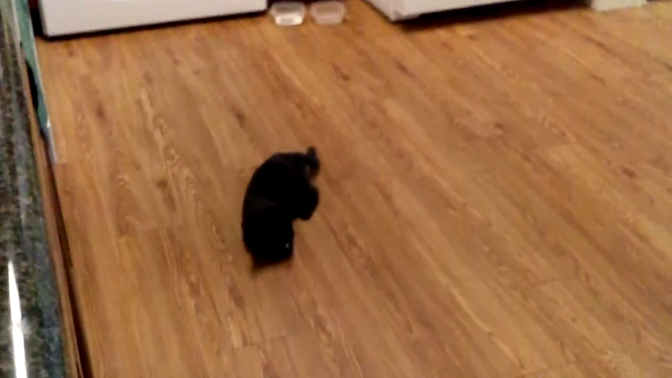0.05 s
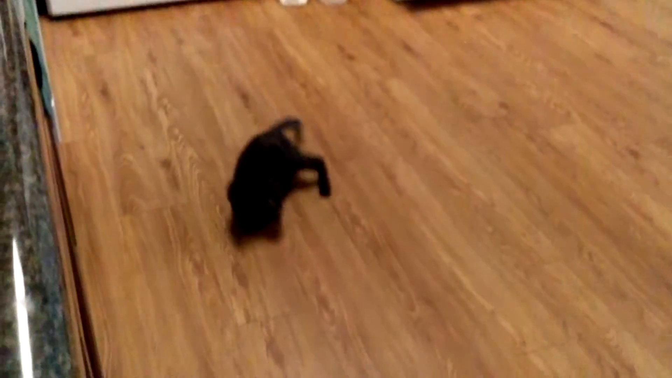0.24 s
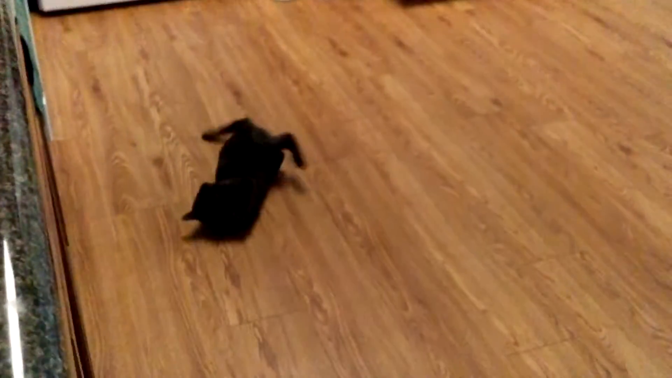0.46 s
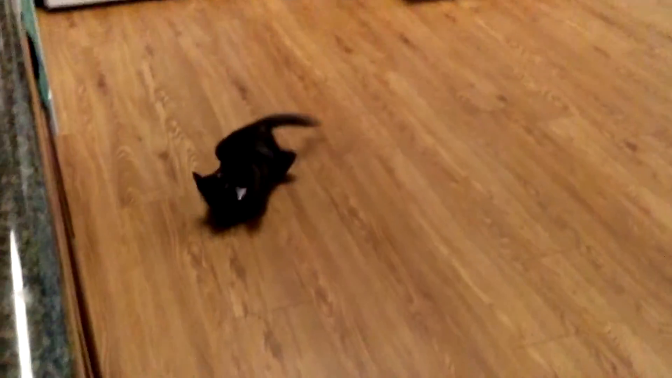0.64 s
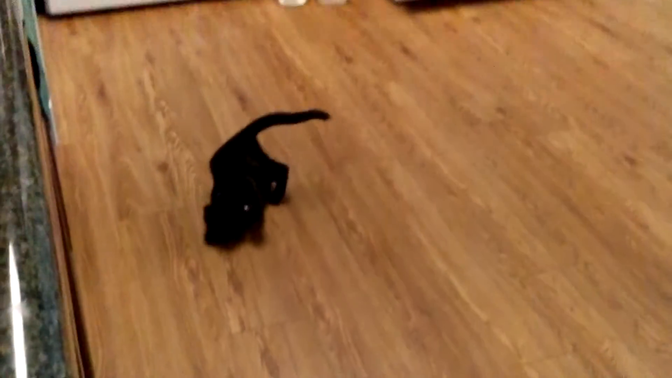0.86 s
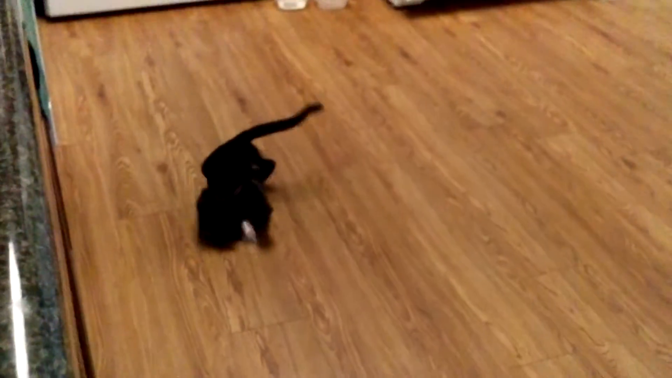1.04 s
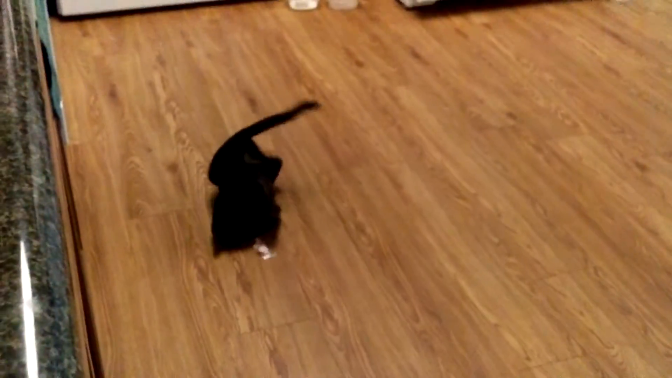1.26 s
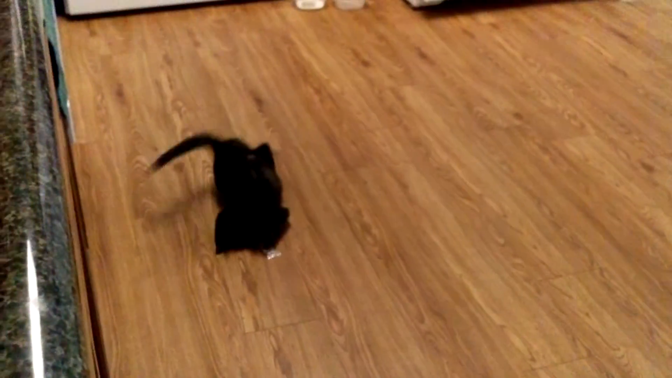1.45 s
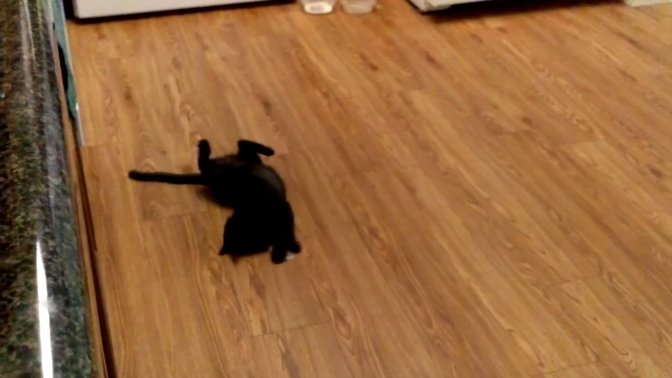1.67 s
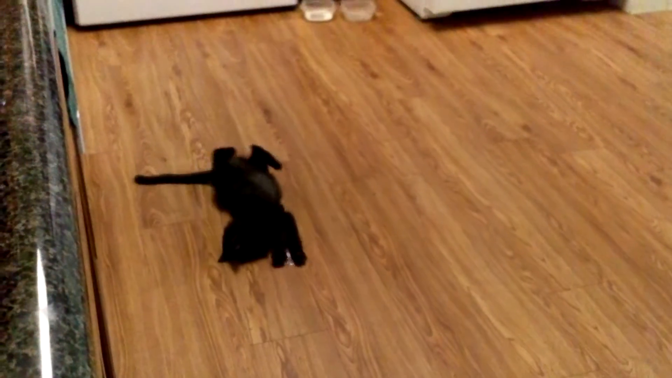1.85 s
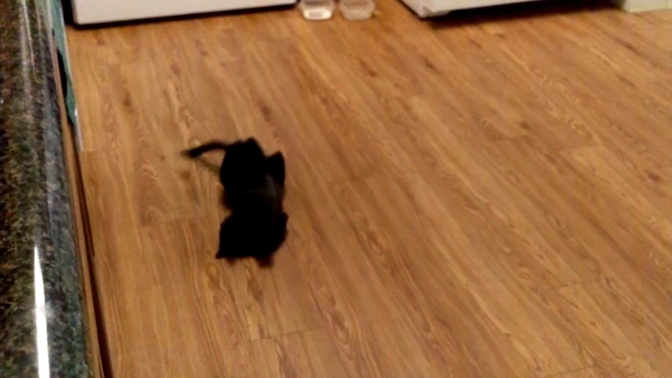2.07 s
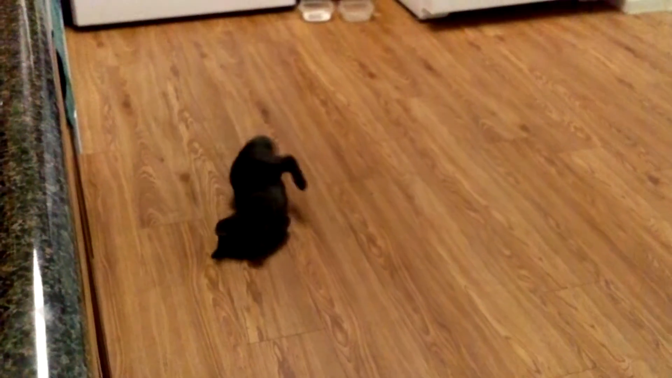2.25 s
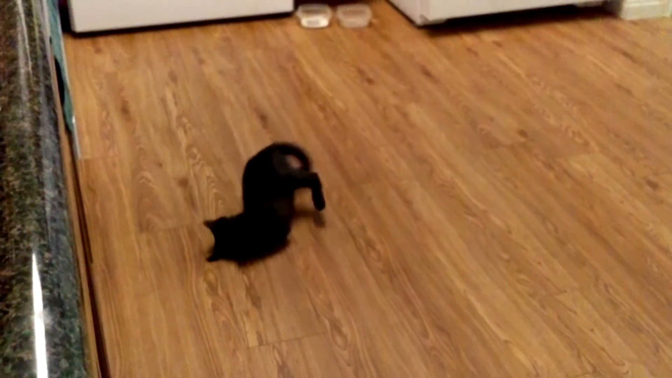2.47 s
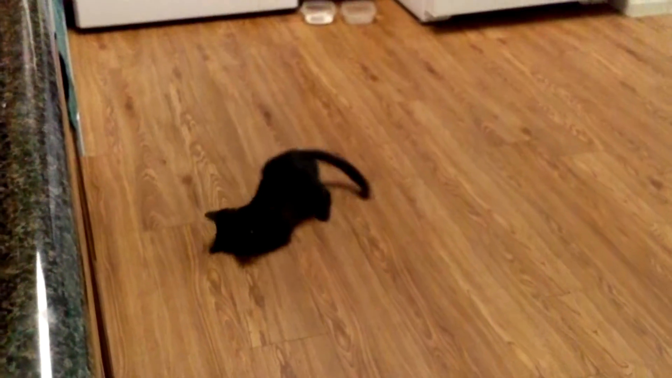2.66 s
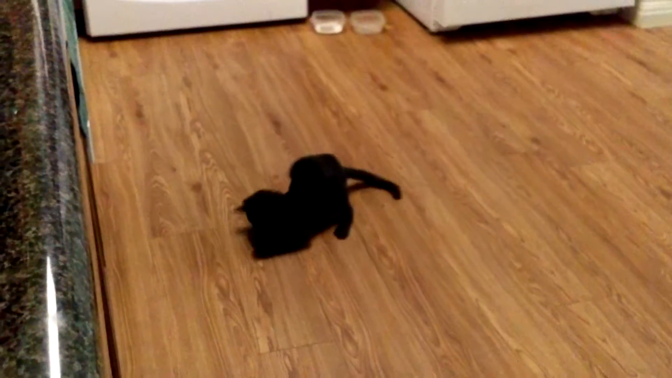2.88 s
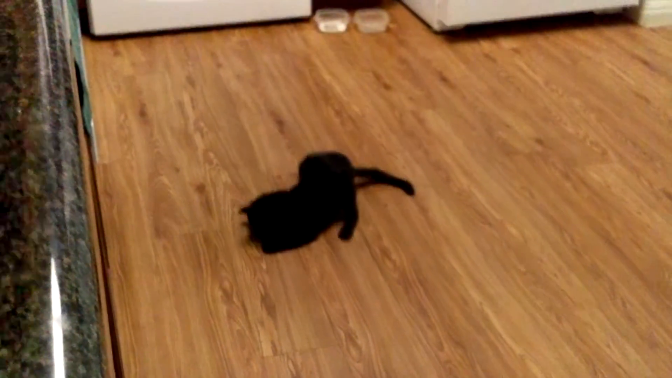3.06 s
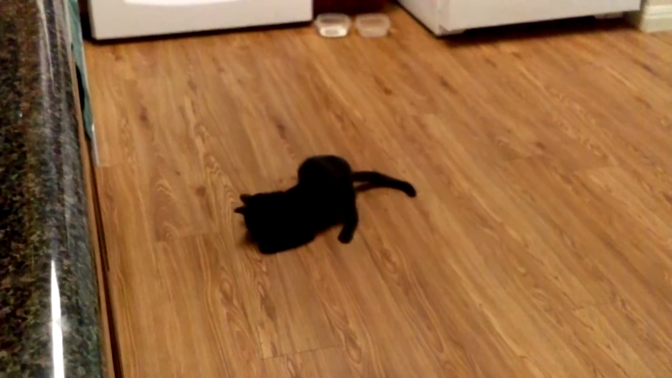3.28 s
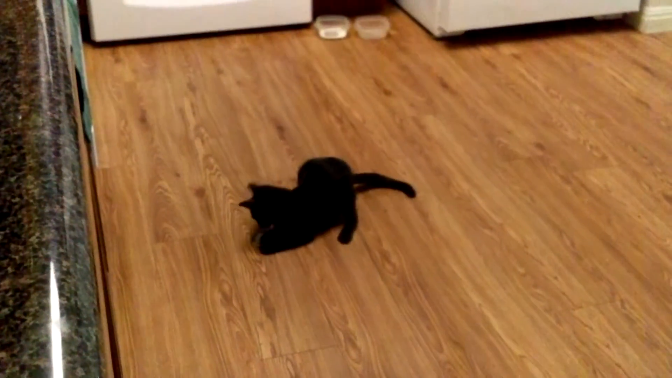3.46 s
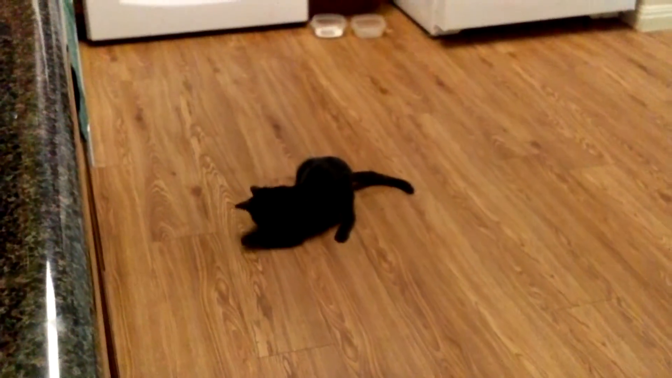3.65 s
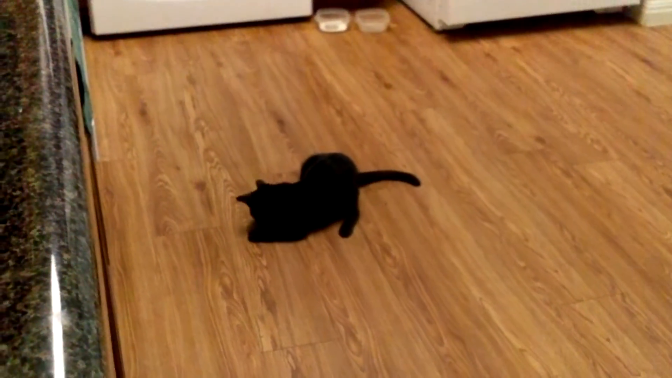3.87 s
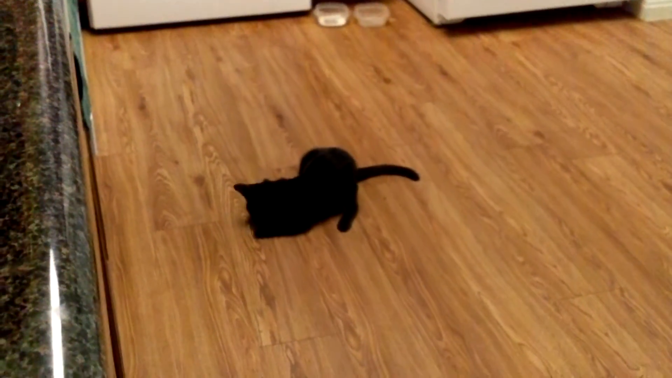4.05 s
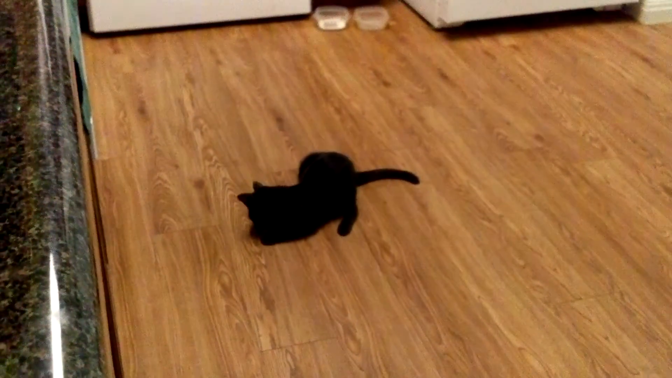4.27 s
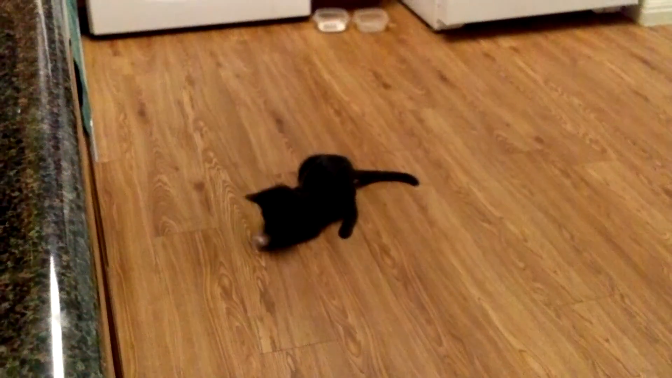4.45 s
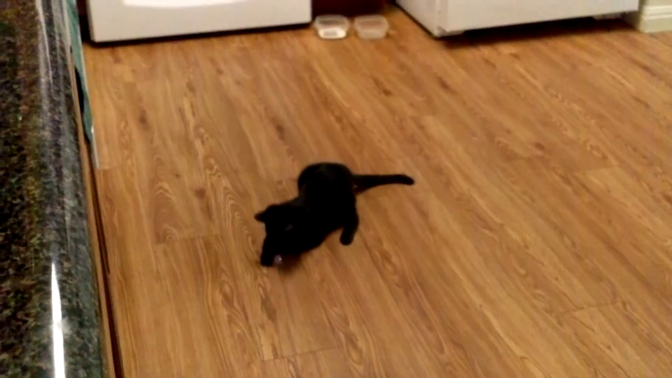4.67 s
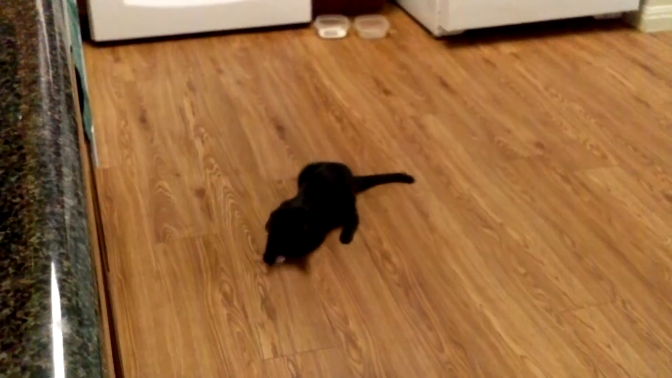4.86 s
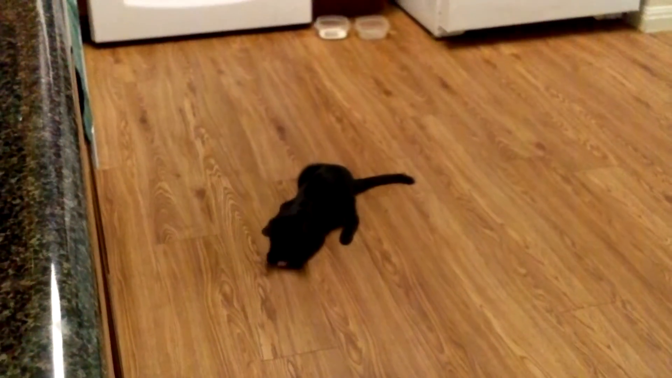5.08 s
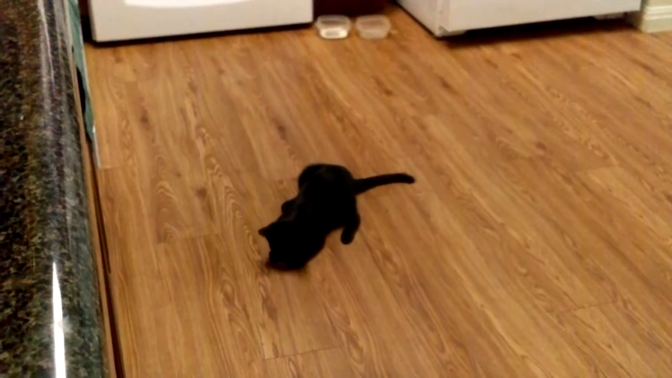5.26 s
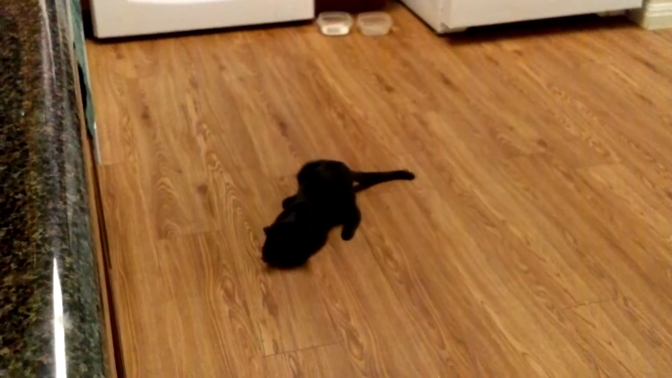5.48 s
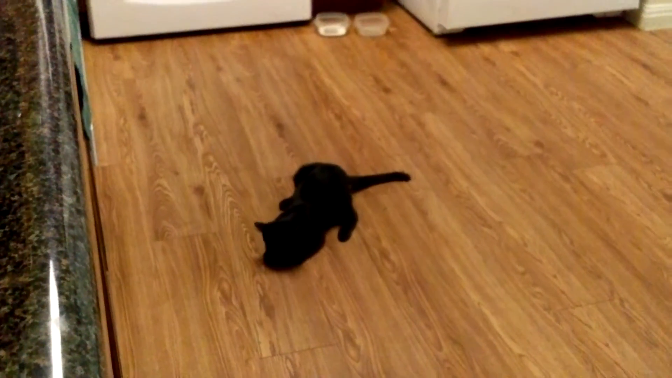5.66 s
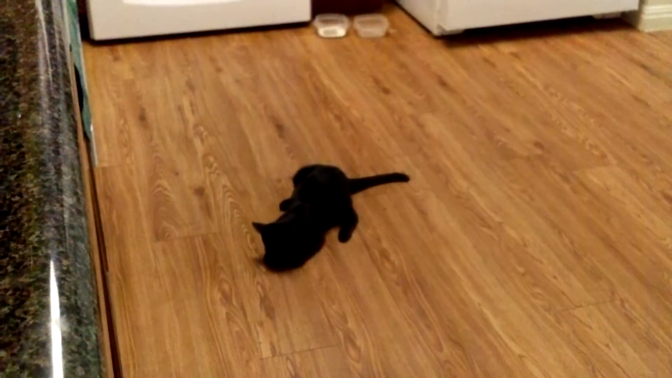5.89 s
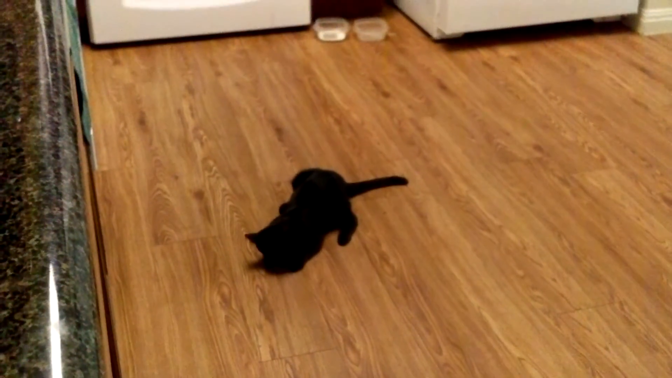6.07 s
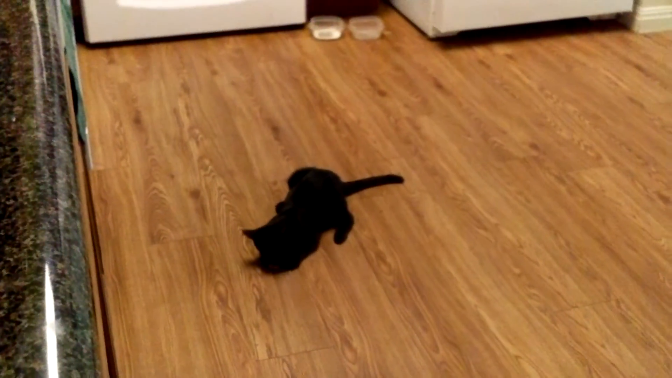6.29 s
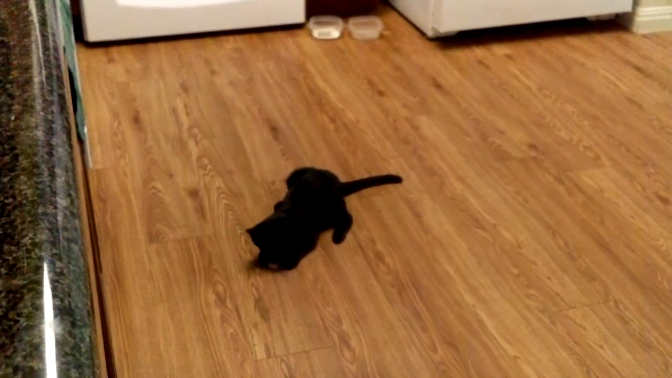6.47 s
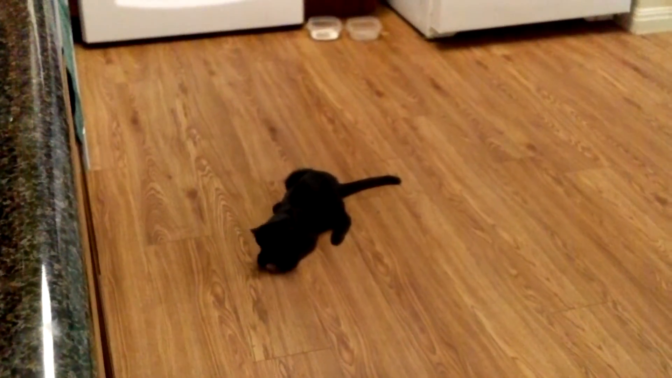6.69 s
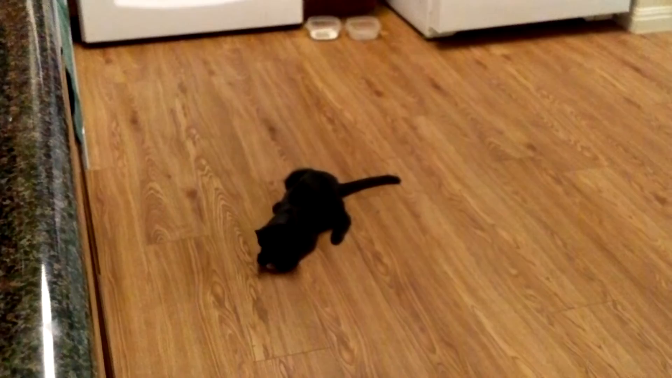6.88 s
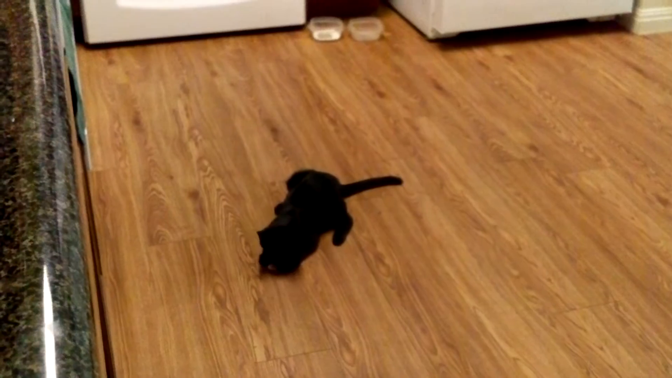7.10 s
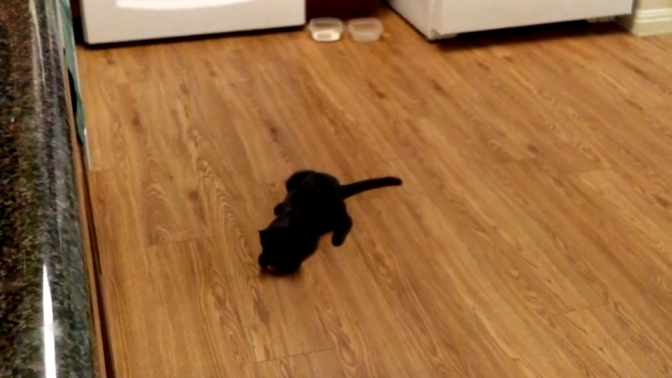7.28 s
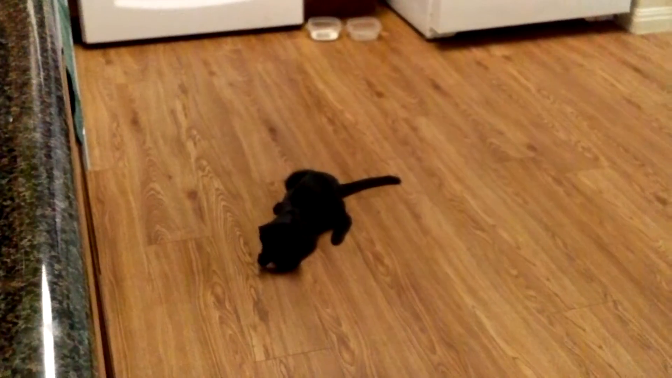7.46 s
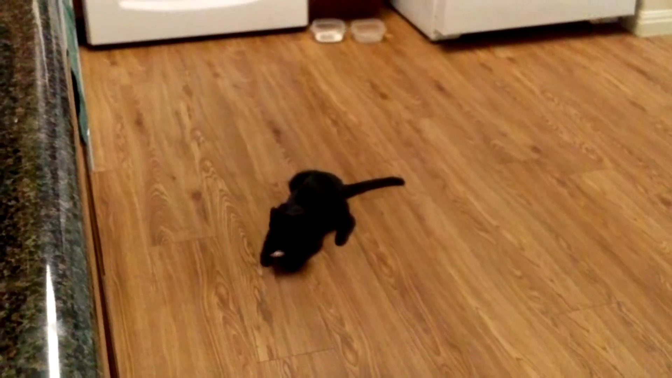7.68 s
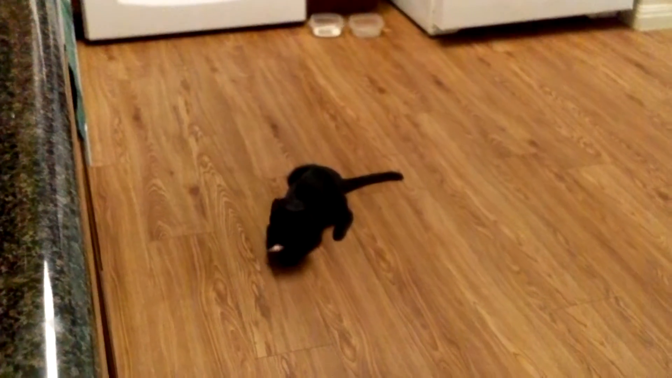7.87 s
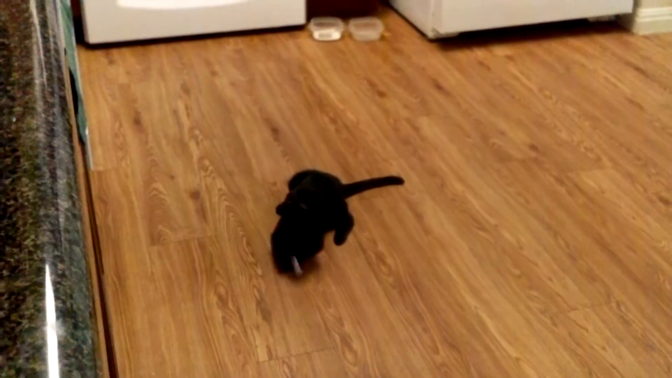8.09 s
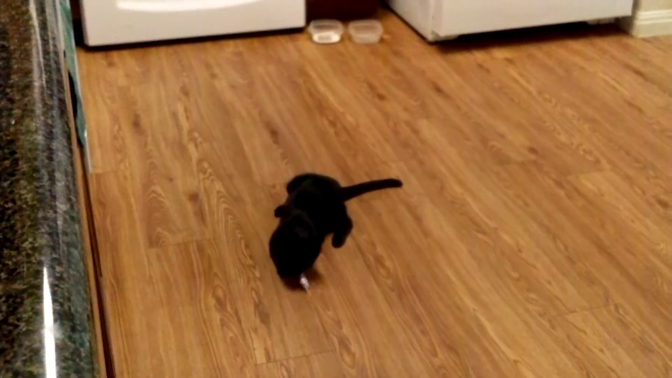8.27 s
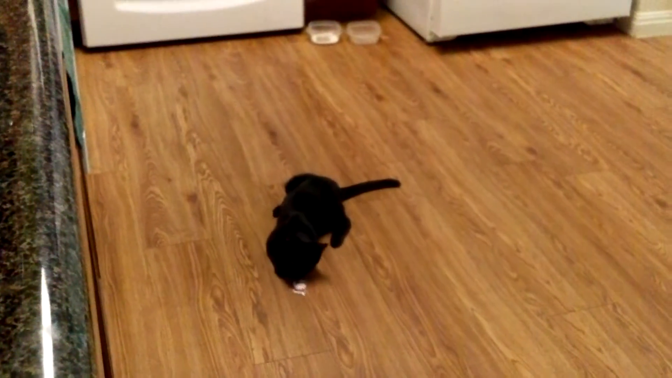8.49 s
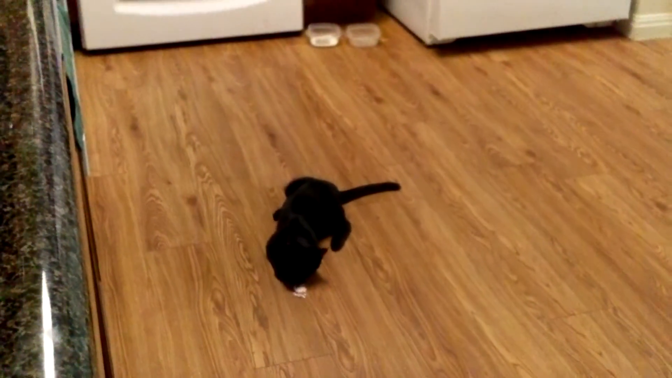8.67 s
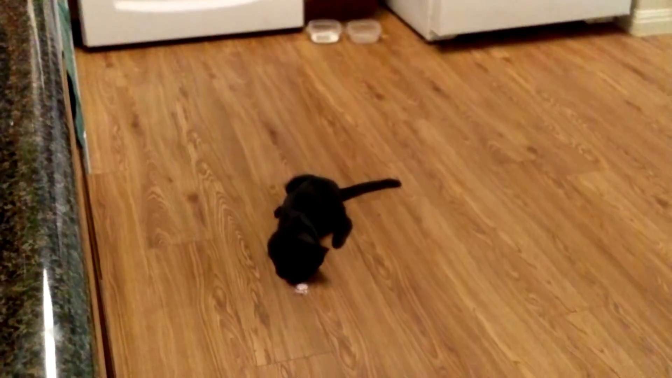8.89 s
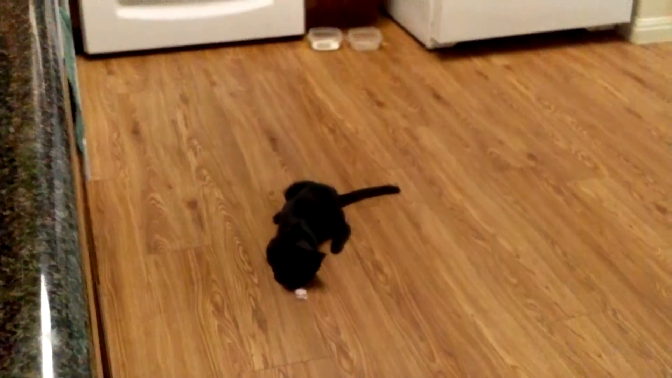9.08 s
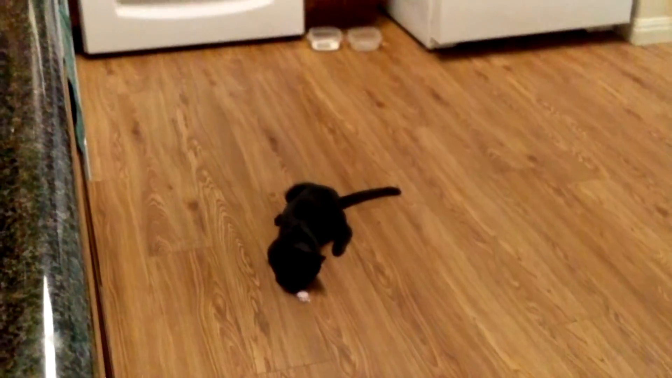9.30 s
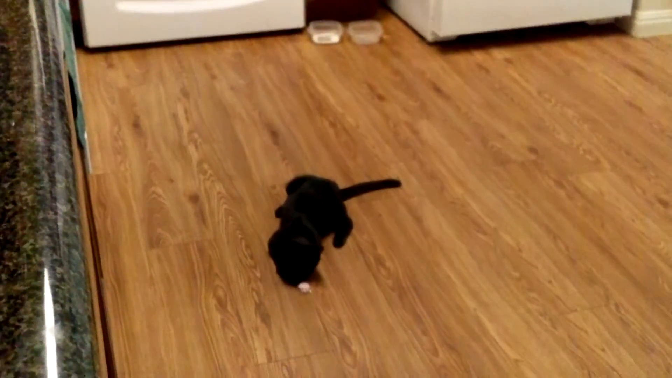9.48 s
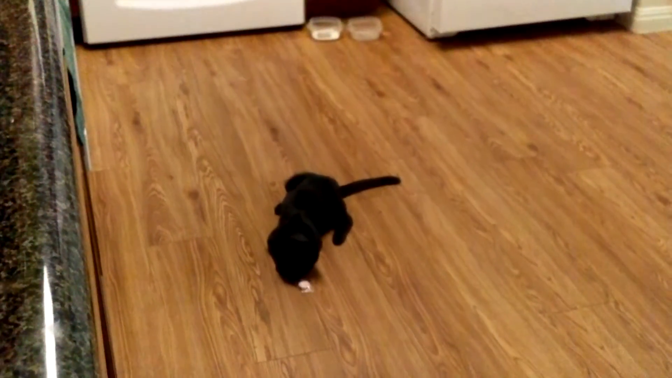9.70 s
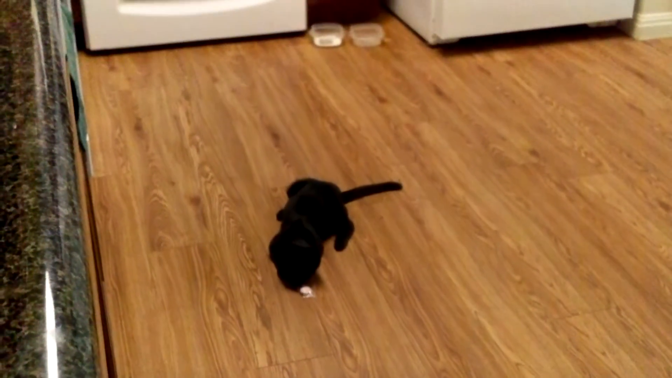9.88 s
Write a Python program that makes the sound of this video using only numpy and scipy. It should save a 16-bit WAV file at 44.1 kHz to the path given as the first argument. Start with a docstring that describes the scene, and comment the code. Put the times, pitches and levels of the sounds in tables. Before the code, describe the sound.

Irregular crackles and snaps of a plastic wrapper batted by a cat across hard boards, two bright clicks as it falls, faint fridge hum.

```python
"""Wrapped mint on a kitchen floor

A cat bats, shoves and nudges a mint in crisp plastic film over laminate boards and twice lets it drop.
The film buckles in swarms of decaying noise clicks and single snaps; noise bursts knock and scrape the boards.
Claws tap a decaying woody note; each landing of the hard sweet is a filtered click with ringing modes.
The bare room adds half a second of reverberation over a faint fridge rush of noise, low hums and a high whistle.
A small recorder limits the band and squashes the loudest peaks."""
import sys
import numpy as np
from scipy import signal
from scipy.fft import rfft, irfft
from scipy.io import wavfile
from scipy.ndimage import uniform_filter1d

SR = 44100
rng = np.random.default_rng(int(sys.argv[2]) if len(sys.argv) > 2 else 0)


def wav_out(sig):
    """Save sig, one row per channel (or a flat mono array), as 16-bit PCM at SR to the path in sys.argv[1]."""
    wavfile.write(sys.argv[1], SR, np.round(np.clip(np.atleast_2d(sig).T, -1, 1) * 32767).astype(np.int16))


N = 438354  # length in samples


def undb(db):
    """Level to amplitude: 20 dB is a factor of ten."""
    return 10 ** (np.asarray(db) / 20)


def unit(x):
    """Energy normalisation: the squares sum to one."""
    return x / np.sqrt(np.sum(x ** 2) + 1e-18)


def seconds(length):
    """Sampling: the time axis of a short sound, in seconds."""
    return np.arange(int(length * SR)) / SR


def decay(t, t60):
    """Exponential decay: the amplitude falls by 60 dB in t60 seconds."""
    return np.exp(-np.log(1000) * t / t60)


def add(out, start_s, x):
    """Superposition: mix x into out from a start time, cut at both ends of out."""
    first = int(start_s * SR)
    x = x[max(-first, 0):]
    first = max(first, 0)
    out[first:first + len(x)] += x[:max(len(out) - first, 0)]


def along(points, hz):
    """Logarithmic frequency scale: interpolate (Hz, value) points along it."""
    point_hz, value = np.transpose(points)
    return np.interp(np.log(hz + 1), np.log(point_hz), value)


def colour(x, points, size=2048):
    """Minimum phase: a folded cepstrum turns a spectrum into a causal filter of unit energy."""
    level_db = along(points, np.fft.rfftfreq(size, 1 / SR))
    cepstrum = irfft(np.log(undb(level_db)))
    cepstrum[1:size // 2] *= 2
    cepstrum[size // 2 + 1:] = 0
    response = unit(irfft(np.exp(rfft(cepstrum))))
    return signal.fftconvolve(x, response)[:len(x)]


def low_pass(x, hz, order=10):
    """Band limiting: a steep elliptic filter, 0.2 dB ripple and 70 dB rejection."""
    sections = signal.ellip(order, .2, 70, hz, fs=SR, output="sos")
    return signal.sosfilt(sections, x)


def walk(rate_hz):
    """Smoothed random steps: a slow wander with a spread near one."""
    step = int(SR / rate_hz)
    held = np.repeat(rng.standard_normal(N // step + 1), step)
    return uniform_filter1d(held, step)[:N]


def cracks(count, decay_s, size=256):
    """Impulsive release: exponentially fading noise bursts of energy one, each with a chance colour."""
    x = rng.standard_normal((count, size)) * np.exp(-np.arange(size) / SR / decay_s)
    return x / np.sqrt(np.sum(x ** 2, axis=1, keepdims=True))


def swarm(length_s, rate, spread_db, decay_s, skew=1):
    """Crackling noise: uneven clicks swell and fade with one push, early if skew is under 1; rms one."""
    count = int(rate * length_s) + 2
    place = (np.arange(count) + rng.uniform(-1, 1, count) + .5).clip(0, count) / count
    # small folds are common, and no fold can store more than so much strain
    strain = np.minimum(rng.exponential(size=count), 2.4)
    sizes = np.sin(np.pi * place ** skew) * undb(spread_db * strain)
    out = np.zeros(int((length_s + .01) * SR))
    for u, size, crack in zip(place, sizes, cracks(count, decay_s)):
        add(out, u * length_s, size * crack)
    return unit(out) * np.sqrt(length_s * SR)


def facet(x, hz, q=2.03, lift=1.86):
    """Plate resonance: the flat of film beside a crease favours its own pitch; the energy is kept."""
    b, a = signal.iirpeak(min(hz, SR / 4), q, fs=SR)
    ring = signal.lfilter(b, a, x)
    return unit(x + lift * ring) * np.sqrt(np.sum(x ** 2))


# broadband rush of the fridge, relative: frequency_hz, level_db
FRIDGE_SPECTRUM = [(20, -14), (60, -11.5), (105, -7), (141, -12), (175, -6), (205, -13), (250, -2.5),
                   (315, -2), (400, -7.5), (540, -6.5), (635, -6.5), (720, -9), (1560, -11.5),
                   (2400, -15.5), (4200, -17.5), (6100, -12), (7400, -17), (8250, -14.5), (10000, -14)]
# steady tones of the background, low hums and one faint high whistle: mean pitch_hz, rms level_db
BACKGROUND_TONES = [(258, -72.5), (640, -71.5), (8256, -74)]


def background(rush_db=-54.5):
    """Noise plus tones: a soft fridge rush, low hums and a high whistle, phase-modulated so pitch wanders."""
    noise = rng.standard_normal(N)
    rush = colour(noise, FRIDGE_SPECTRUM + [(13000, -53)], size=8192)
    t = np.arange(N) / SR
    tones = sum(undb(db) * np.sin(2 * np.pi * hz * t + 2 * walk(6)) for hz, db in BACKGROUND_TONES)
    waver = undb(.25 * walk(5))
    return waver * (undb(rush_db) * rush + np.sqrt(2) * tones)


# spells in which the cat keeps nudging the wrapper: start_s, end_s, mean crinkle level_db before mixing
NUDGE_SPELLS = [(0.679, 1.099, -46.5), (2.121, 2.411, -49.5), (3.121, 3.42, -52.5), (3.732, 3.948, -57),
                (4.059, 4.199, -51.5), (4.918, 5.1, -55.5), (5.872, 5.96, -54), (7.25, 7.761, -51.5),
                (7.842, 7.96, -56.5)]


def nudges(per_s=14, length_s=.07, spread_db=1.7, floor_db=-11):
    """Jittered timing: light shoves of varying force, one at a chance moment in each slot of a spell."""
    rows = []
    for start, end, db in NUDGE_SPELLS:
        count = max(round(per_s * (end - start)), 1)
        lateness, forces = rng.random(count), rng.standard_normal(count)
        for k, (late, force) in enumerate(zip(lateness, forces)):
            nudge_start = start + (k + late) / count * (end - start - length_s)
            rows.append((nudge_start, length_s, db + spread_db * force, floor_db))
    return rows


# single shoves, short or long, whose crinkle and scrape swell and fade, before mixing:
# start_s, length_s, crinkle level_db, floor share_db (relative to the crinkle)
SINGLE_SHOVES = [(-0.025, 0.048, -27, -13.5), (0.05, 0.12, -44, -12.5), (0.2, 0.22, -43, -14.5),
                 (0.53, .12, -34, -16), (1.122, .055, -39.5, -16), (1.308, .12, -44.5, -0.5),
                 (1.63, 0.058, -40.5, -2.5), (1.917, 0.18, -43.5, -16.5), (2.025, 0.11, -35.5, -16.5),
                 (2.6, .09, -56, -9), (3.95, .06, -48, -11), (4.228, 0.046, -42, -7),
                 (4.28, .12, -45, -10.5), (4.42, 0.084, -39, -17), (4.535, 0.092, -34.5, -18),
                 (4.672, 0.085, -38.5, -12.5), (5.29, .07, -53, -4.5), (5.39, 0.12, -53, -6),
                 (6.09, 0.095, -42, -11.5), (6.19, 0.12, -51, -10), (7.47, 0.16, -44.5, -14),
                 (8.037, 0.059, -46, -20), (8.4, .034, -34.5, -11.5), (8.443, 0.026, -40.5, 2.5),
                 (8.83, .06, -51.5, -8.5)]


def shoves(film, boards, pressed_hz=5800, free_hz_per_db=200, pop_db=26):
    """Distributed buckling: crinkle and scrape swell together, and one crease pops on the way."""
    for start, length, db, floor_db in list(SINGLE_SHOVES) + nudges():
        # film pressed on the floor sounds low, and higher as it comes free
        hz = pressed_hz - free_hz_per_db * floor_db
        crinkle = swarm(length, rate=600, spread_db=5.5, decay_s=0.00039)
        pop = cracks(1, decay_s=0.00037)[0]
        scrape = swarm(length, rate=450, spread_db=2, decay_s=0.00078)
        add(film, start, undb(db) * facet(crinkle, hz))
        # pop energy is set against the rms of the crinkle
        add(film, start + length * rng.beta(2, 2), undb(db + pop_db) * facet(pop, hz))
        add(boards, start, undb(db + floor_db) * scrape)


# sharp bats and taps of the paw, before mixing:
# start_s, snap energy level_db, settling length_s, floor share_db (relative to the film), facet pitch_hz
PAW_BATS = [(0.0481, 0.5, 0.054, -15, 9200), (0.1833, -8, 0.021, -26, 8400), (0.4337, 0, .08, -12.5, 9000),
            (0.5637, -5, 0.031, -12, 8800), (0.8136, -6, .06, -12.5, 6400),
            (1.0299, -10.5, 0.022, -9, 8150), (1.5543, 0, 0.024, -11.5, 9900),
            (1.6357, -1, 0.027, -14, 10000), (1.8288, -7, .08, -19, 7300), (2.206, -5, .012, -21, 10000),
            (2.289, -10, .06, -31, 8500), (2.8235, -14.5, .18, -11.5, 9000),
            (3.0154, -5, 0.048, -10.5, 9250), (3.0998, -10, .04, -9.5, 8600), (3.154, -4, .012, -21, 10000),
            (4.214, -9.5, .04, -18, 9150), (4.7218, -6, .03, -6.5, 3900), (4.901, -14.5, 0.055, -12, 7860),
            (5.4882, -3, 0.079, -11, 7900), (5.7044, -6.5, .02, -9.5, 8000), (5.8362, -11, .04, -9.5, 7600),
            (5.9772, -8.5, .04, -20, 10000), (6.3146, -5, .012, -15, 6740), (6.5595, -22, 0.017, -14, 7600),
            (7.2257, -20.5, 0.032, -2, 4000), (7.295, -11, .012, -16, 10000),
            (7.3914, -6.5, 0.038, -25, 9800), (7.6476, -7.5, .06, -31, 9400), (8.191, -4, .012, -17, 10000),
            (8.307, 6.5, 0.0094, -37, 9700), (9.166, -16, 0.0079, -15, 7800)]


def bats(film, boards, creak_s=.013, creak_db=-36, settle_db=-37, knock_db=-1):
    """Snap-through: a crease creaks, snaps and knocks the boards; film settles while the sweet skids."""
    for start, db, settle_s, floor_db, hz in PAW_BATS:
        creak = swarm(creak_s, rate=800, spread_db=6, decay_s=0.00077)
        snap = cracks(1, decay_s=0.00053)[0]
        settle = swarm(settle_s, rate=600, spread_db=4.5, decay_s=0.0002, skew=0.85)
        knock = cracks(1, decay_s=0.0027)[0]
        skid = swarm(settle_s, rate=450, spread_db=4, decay_s=0.00066, skew=0.57)
        add(film, start - creak_s, undb(db + creak_db) * facet(creak, hz))
        add(film, start, undb(db) * facet(snap, hz))
        add(film, start, undb(db + settle_db) * facet(settle, hz))
        add(boards, start, undb(db + floor_db + knock_db) * knock)
        add(boards, start, undb(db + floor_db + settle_db) * skid)


# landings and bounces of the sweet: start_s, click energy level_db before mixing,
# corner_hz (lower where the wrapper cushions the blow)
LANDINGS = [(1.179, 10, 12000), (1.1831, 16, 8950), (1.2695, 6.5, 4770), (8.2056, 15.5, 7340),
            (8.2076, 15, 2920), (8.412, -7, 1200), (8.454, -9, 1090)]


def rattle(film, length_s=.09, rattle_db=-47.5):
    """Shaken film: a landing looses a few sparse crackles, their rms set against the click."""
    for start, click_db, _ in LANDINGS:
        crackle = swarm(length_s, rate=110, spread_db=8, decay_s=0.00017, skew=1.1)
        add(film, start, undb(click_db + rattle_db) * crackle)


# relative spectrum of the plastic film: frequency_hz, level_db
FILM_SPECTRUM = [(200, -34), (800, -21), (2500, -12), (4600, -5.5), (6800, -3.5), (9200, -0.5),
                 (10400, -1.5), (13000, -8)]
# relative spectrum of the floor boards: frequency_hz, level_db
BOARD_SPECTRUM = [(60, -17), (250, -14.5), (600, -8), (1100, -1.5), (1700, -2.5), (2100, -1), (2700, 1),
                  (3800, -2.5), (6000, -8), (11000, -33)]


def wrapper():
    """Source and radiator: buckling drives the film, and each push on the sweet drives the boards."""
    film, boards = np.zeros(N), np.zeros(N)
    shoves(film, boards)
    bats(film, boards)
    rattle(film)
    return undb(-1) * colour(film, FILM_SPECTRUM) + undb(1.47) * colour(boards, BOARD_SPECTRUM)


# claws tick on the boards: start_s, ring energy level_db before mixing
CLAW_TICKS = [(0.1493, -19), (7.768, -21.5), (7.933, -31)]


def claws(ring_hz=2100, ring_t60=0.0075, tap_db=-6):
    """Impact and resonance: a claw taps a board, which answers with a short woody note."""
    out, t = np.zeros(N), seconds(.03)
    ring = unit(np.sin(2 * np.pi * ring_hz * t) * decay(t, ring_t60))
    for (start, db), tap in zip(CLAW_TICKS, cracks(len(CLAW_TICKS), decay_s=.0008)):
        add(out, start, undb(db) * ring)
        add(out, start, undb(db + tap_db) * unit(colour(tap, BOARD_SPECTRUM)))
    return out


# ring of the sweet on the boards: nominal pitch_hz, relative level_db
SWEET_MODES = [(3630, 2), (4500, 4), (5220, -1), (5700, -5), (6300, -8), (7280, 3.5)]
# relative spectrum of a hard contact: frequency_hz, level_db
CONTACT_SPECTRUM = [(40, -37), (200, -25.5), (500, -17.5), (1000, -12.5), (1400, -12.5), (2200, -6.5),
                    (3000, -5), (4200, -2.5), (6000, 1.5), (7500, 0), (9500, 0), (13000, -21.5)]


def mint(ring_t60=0.0062, ring_db=-10, wobble=0.027):
    """Modal synthesis: each landing is one hard click and a short ring of the sweet."""
    clicks, rings = np.zeros(N), np.zeros(N)
    t = seconds(.05)
    hz, db = np.transpose(SWEET_MODES)
    for start, click_db, corner_hz in LANDINGS:
        # it lands on another edge each time, which shifts its modes
        shift, sign = rng.standard_normal((2, len(hz)))
        mode_hz = hz * (1 + wobble * shift)
        modes = np.sin(2 * np.pi * np.outer(mode_hz, t))
        ring = (undb(db) * np.sign(sign)) @ modes
        add(rings, start, undb(click_db + ring_db) * unit(ring * decay(t, ring_t60)))
        push = np.exp(-2 * np.pi * corner_hz * t)
        add(clicks, start, undb(click_db) * unit(colour(push, CONTACT_SPECTRUM)))
    return clicks + rings


# reverberation of the kitchen: band centre_hz, t60_s
KITCHEN_DECAY = [(150, 0.091), (500, 0.39), (1400, 0.61), (3700, 0.51), (7000, 0.47), (10000, 0.49)]
# resonances that stand out of the reverberation: pitch_hz, relative level_db
STANDING_MODES = [(3037, -15), (3235, 5), (4611, 5), (5206, 9), (6102, 1), (6600, 1), (7715, -22),
                  (8246, -19), (8884, 11)]


def kitchen(build_s=0.00022, early_db=-10, modes_db=-20, modes_t60=0.55):
    """Reverberation: sparse reflections from cupboards and walls, then a dense tail dying band by band."""
    t = seconds(.9)
    sparse = rng.standard_normal(len(t)) * (rng.random(len(t)) < .006) * np.exp(-t / 0.037)
    dense = rng.standard_normal(len(t))
    early = undb(early_db) * unit(sparse) * np.sqrt(0.045 * SR)
    spectrum = rfft(dense + early)
    hz = np.fft.rfftfreq(len(t), 1 / SR)
    centres, t60s = np.transpose(KITCHEN_DECAY)
    tail = 0
    # overlapping bands add up to the whole spectrum
    for share, t60 in zip(np.eye(len(centres)), t60s):
        band = irfft(spectrum * along(np.c_[centres, share], hz), len(t))
        tail = tail + band * decay(t, t60)
    modes = sum(undb(db) * np.sin(2 * np.pi * (f * t + rng.random())) for f, db in STANDING_MODES)
    tail = unit(tail) + undb(modes_db) * unit(modes * decay(t, modes_t60))
    return unit(tail * (1 - np.exp(-t / build_s)))


def scene():
    """Direct and reverberant field: dry sources plus their convolution with the room, over the background."""
    crinkle, ticks, drops = wrapper(), claws(), mint()
    direct = undb(-6.0) * crinkle + undb(-5) * drops + ticks
    into_room = undb(-2.0) * crinkle + undb(-4) * drops + undb(-11.5) * ticks
    echo = signal.fftconvolve(into_room, kitchen())[:N]
    return (direct + echo + background())[None]


def record(dry, band_hz=10450, mirror_db=-22, ceiling=.72, top_hz=16000):
    """Aliasing and saturation: the band's upper edge mirrors faintly above it, and peaks are squashed."""
    band = low_pass(dry, band_hz, order=12)
    # alternating signs mirror the spectrum about a quarter of the sample rate
    mirror = low_pass(band * (-1) ** np.arange(N), 12200, order=8)
    sound = band + undb(mirror_db) * mirror
    squashed = sound / (1 + (sound / ceiling) ** 4) ** (1 / 4)
    return low_pass(squashed, top_hz)


dry = scene()
out = record(dry)
wav_out(out)
```